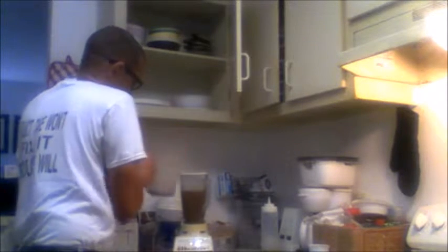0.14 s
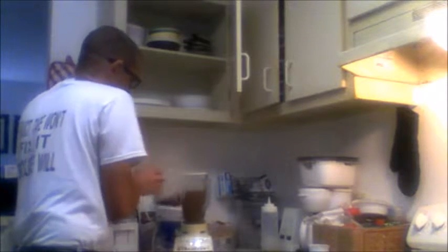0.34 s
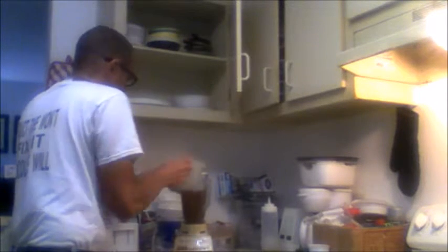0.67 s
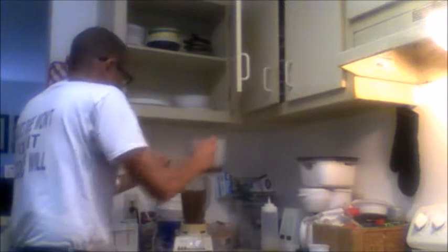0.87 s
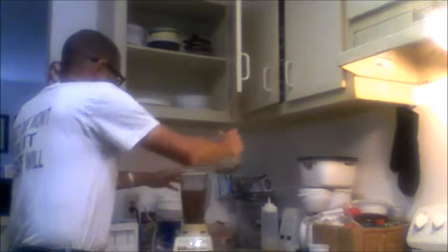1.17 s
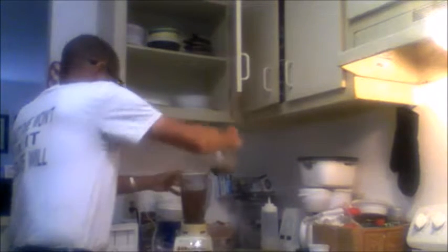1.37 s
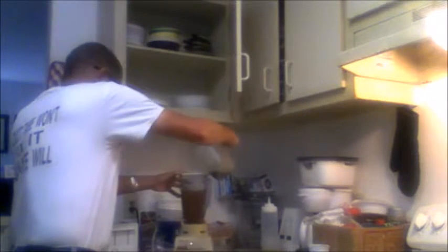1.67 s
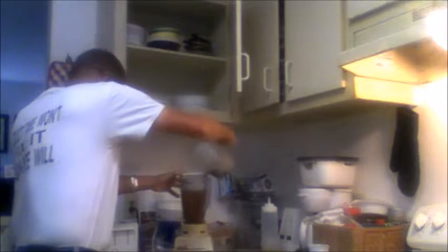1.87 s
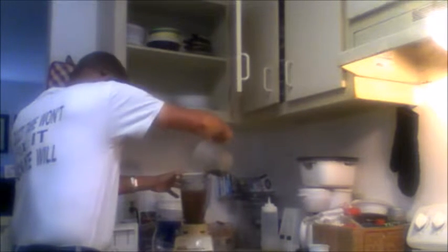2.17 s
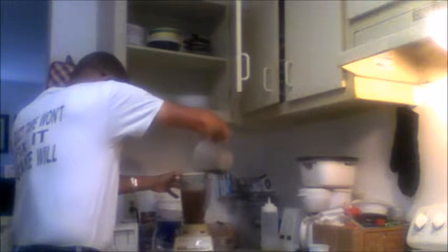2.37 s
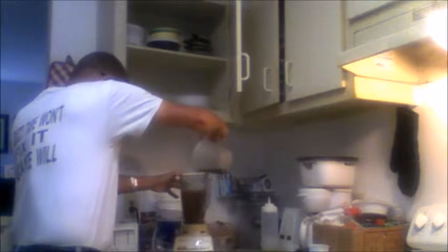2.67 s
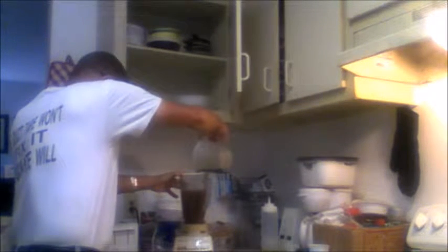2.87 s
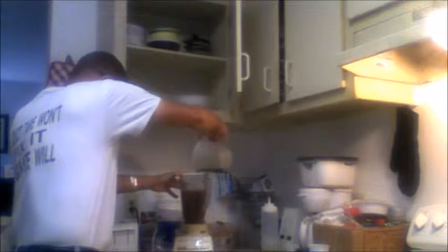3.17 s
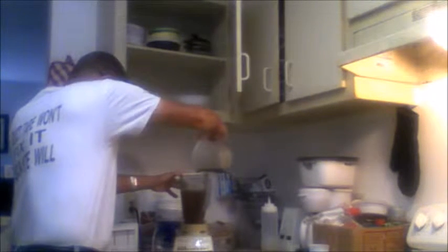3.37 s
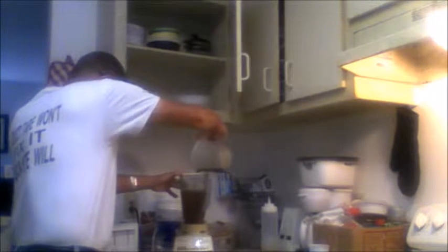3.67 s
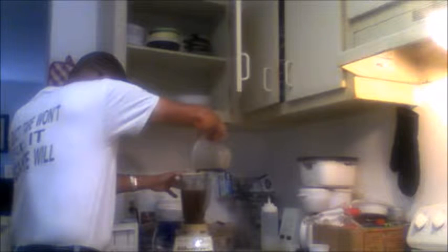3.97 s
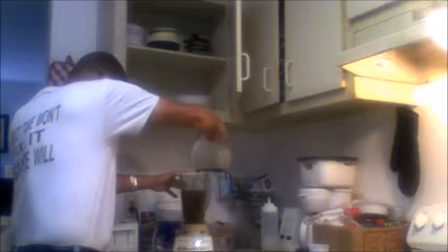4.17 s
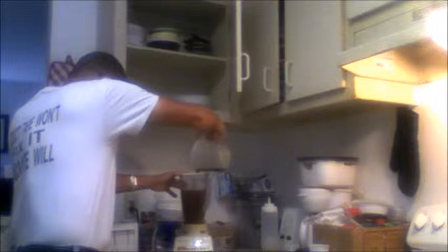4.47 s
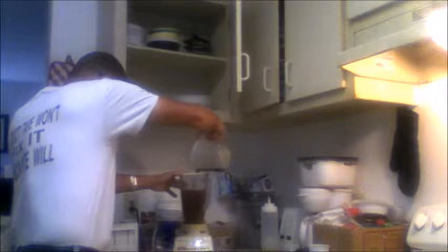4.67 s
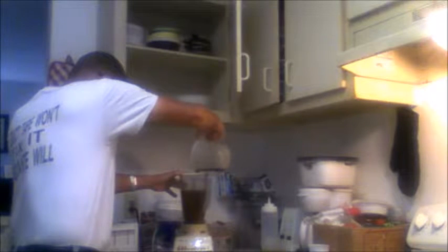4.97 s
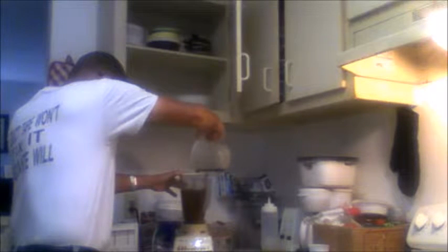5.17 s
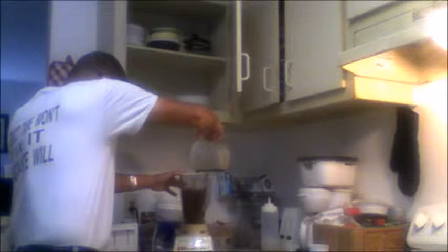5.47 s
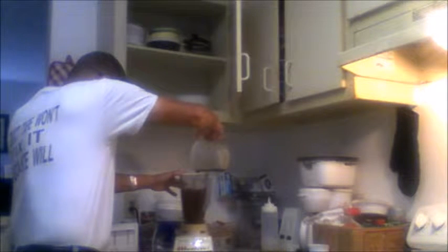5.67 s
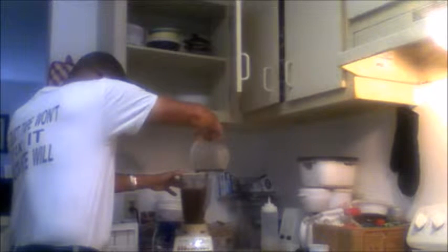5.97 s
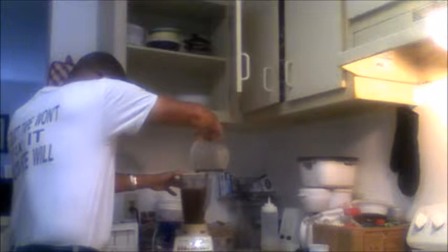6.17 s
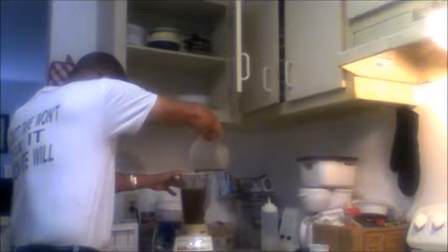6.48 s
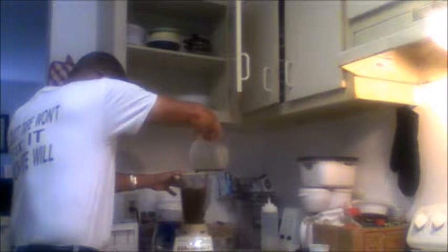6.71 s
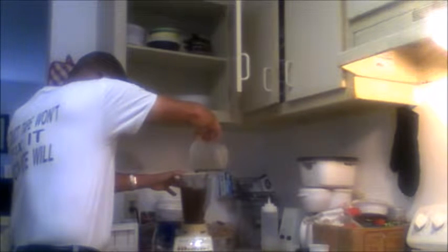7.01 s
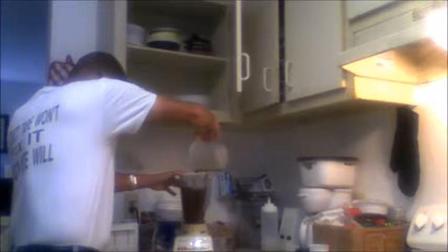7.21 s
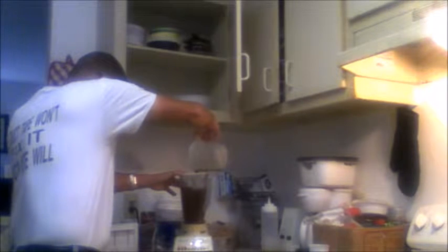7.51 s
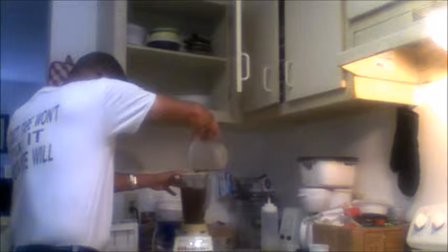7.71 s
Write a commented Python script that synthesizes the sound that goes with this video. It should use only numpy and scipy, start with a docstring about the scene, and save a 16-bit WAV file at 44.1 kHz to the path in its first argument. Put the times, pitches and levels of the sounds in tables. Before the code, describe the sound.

A kitchen blender is already running, its shrill motor whine wavering slightly over a faint hum. Blades churn liquid with a rough, rasping, hissing surge several times a second. Irregular hollow knocks of trapped air and small wet splats break through, the hardest near the middle, with more firm knocks toward the end. Close, narrow-band microphone with little bass, dulled highest treble and a short room echo.

```python
"""A countertop blender in a small kitchen, already running, while liquid is poured slowly into its jar.
From the first moment the motor whines and wavers over its hum (sines locked to one gliding shaft), and the
blades churn, rasp and hiss in surges (random clicks ringing resonances). Soon splats hit the jar wall, air
pockets knock in hollow modes and fine spray swishes up. The strongest gulp comes near the middle with the
biggest surge; hard knocks return near the end, where the bite between surges is weakest."""
import sys
import numpy as np
from scipy import signal
from scipy.fft import rfft, irfft
from scipy.io import wavfile
from scipy.ndimage import uniform_filter1d, minimum_filter1d

SR = 44100
rng = np.random.default_rng(int(sys.argv[2]) if len(sys.argv) > 2 else 0)


def store_pcm(level_fs):
    """Save levels as 16-bit WAV."""
    pcm = np.round(np.clip(level_fs, -1, 1) * 32767).astype(np.int16)
    wavfile.write(sys.argv[1], SR, np.atleast_2d(pcm).T)


N = 346185

# Motor: turning points of the shaft speed as it sags and recovers: time_s, speed_turns_per_s
SHAFT_SPEED = [(0, 241.5), (.27, 235.3), (.57, 243), (1.1, 232.3), (1.45, 243.7), (1.8, 233.4), (2, 233.2),
               (2.27, 238.6), (2.54, 234.5), (2.94, 246.8), (3.22, 233.6), (3.52, 238), (3.82, 232.2),
               (4.13, 240.5), (4.29, 238.7), (4.45, 240.4), (4.62, 237.8), (4.83, 242.2), (5.52, 234.5),
               (5.81, 244), (6.01, 237), (6.18, 239.1), (6.35, 238.1), (6.63, 245), (6.85, 236.8),
               (7.02, 237), (7.25, 244.9), (7.63, 238.4), (7.85, 238.7)]
# Whine overtones: multiple_of_turn_rate, level_db (relative to the whine's law)
WHINE_ORDERS = [(11, -22), (12, 0.5), (18, -17)]
# How the housing passes the gliding whine: pitch_hz (of the 12th multiple), gain_db
HOUSING = [(2790, -2.5), (2800, -1.5), (2825, -2.5), (2845, -2), (2858, 0), (2878, -1.5), (2905, .5),
           (2930, -7.5), (2963, -6)]
# Rotor hum: multiple_of_turn_rate, level_db
HUM_ORDERS = [(4, -58), (4.5, -50.5), (5, -60)]
# The base shaking on the counter, once a turn: time_s, level_db
SHAKING = [(0.0, -47), (.13, -49), (.24, -56), (.45, -50.5), (.65, -49.5), (.9, -53.5), (1.51, -49.5),
           (1.71, -58), (2.12, -45.5), (2.21, -60), (2.53, -56), (2.66, -60), (2.78, -47.5), (3.17, -62),
           (3.26, -52.5), (3.65, -62.5), (3.87, -42.5), (3.98, -53), (4.62, -60.5), (4.79, -51.5),
           (5.08, -55.5), (5.2, -54), (5.56, -57), (5.73, -51), (5.95, -58.5), (6.2, -54), (6.38, -58),
           (6.52, -49.5), (6.7, -55), (7.03, -56), (7.24, -52), (7.85, -57.5)]
# Broad drone of the base on the counter: frequency_hz, density_db_per_hz
DRONE_COLOUR = [(30, -44.5), (70, -61.5), (100, -35.5), (120, -7.5), (190, -8.5), (280, 2.5), (345, -7),
                (400, -15), (700, -9.5), (1500, -23)]

# Blades: how hard they bite between surges, easing as the jar fills: time_s, bite_db
CALM_BITE = [(0.0, -0.3), (1.15, 4), (2.2, -2), (3.0, -8), (4.5, -8), (5.5, -5.5), (6.65, -9),
             (7.85, -12.6)]
# Surges as the vortex opens: crest_s, half_length_s, bite_rise_db, splashing_rise_db
SURGES = [(0.052, 0.073, 8, 6.5), (0.281, 0.077, 6, 4.5), (0.602, 0.11, 4.5, 3), (0.886, 0.021, 6.5, 3.5),
          (1, 0.077, 3.5, 5.5), (1.38, 0.034, 5, 3), (1.679, 0.048, 5.5, 7), (1.838, 0.029, 6, 6),
          (2.023, 0.071, 8, 3), (2.307, 0.075, 3.5, -1.8), (2.423, 0.083, 6, 6), (2.813, 0.118, 7, -1),
          (3.307, 0.075, 13, 8.5), (3.535, 0.056, 3, 0.5), (3.854, 0.085, 16.9, 9.5),
          (4.026, 0.062, 9.3, 4.5), (4.237, 0.1, 5.5, 5.5), (4.658, 0.024, 6, 1.5), (4.813, 0.043, 10, 3.5),
          (4.985, 0.033, 10, 7), (5.175, 0.074, 11.4, 2), (5.344, 0.086, 1.5, 6), (5.592, 0.061, 5, 1.5),
          (5.755, 0.027, 6.5, 0.5), (6.11, 0.09, 6.7, 5), (6.387, 0.081, 10, 4), (6.812, 0.058, 9, 6),
          (7.01, 0.091, 10.5, 5), (7.181, 0.024, 8.5, 1), (7.396, 0.069, 10.5, 4.5),
          (7.556, 0.11, 9.5, 7.5), (7.81, 0.1, 10.4, 1.5)]
# How each sound follows the bite: level_db (at a bite of 0 dB), slope_db_per_db
WHINE_LAW = (-30.5, 0.56)
SPLASH_LAW = (-39.5, 0.2)
GRIND_LAW = (-30, 0.94)
RASP_LAW = (-39, 1.2)
SPRAY_LAW = (-33, 0.2)
# Ringing of the jar wall: frequency_hz, width_hz, level_db
SPLASH_MODES = [(730, 5.5, -0.5), (765, 10, -12.5), (842, 20, -4.5), (951, 26, -0.5), (1079, 7.6, 3),
                (1174, 78, -6.5), (1278, 14, 3), (1299, 22, -5.5), (1473, 24, 3), (1720, 10, -12)]
# Ringing of blades and coupling: frequency_hz, width_hz, level_db
GRIND_MODES = [(1890, 40, -12), (1960, 34, -8), (2089, 36, -10), (2207, 40, -8), (2337, 20, 1),
               (2387, 18, 1.5), (2445, 30, 3), (2543, 28, 2), (2617, 20, 2), (2659, 22, 0), (2855, 70, -6),
               (3058, 26, 2), (3100, 28, -7)]
# Ringing of the rasping blades: frequency_hz, width_hz, level_db
RASP_MODES = [(3330, 24, -5), (3381, 26, 3), (3457, 18, 5.5), (3508, 26, 5), (3600, 50, -8), (3714, 50, -6),
              (3790, 36, -8)]
# High ringing of the jar under the spray: frequency_hz, width_hz, level_db
SPRAY_MODES = [(3919, 34, -1), (4059, 40, 1), (4242, 70, 1.5), (4365, 36, -1), (4479, 44, 1),
               (4576, 44, -1), (4748, 60, -1), (5114, 50, -2), (5255, 90, 0), (5523, 60, 0), (5631, 60, 1),
               (5846, 70, -2), (6040, 60, -3.5), (6298, 60, -4)]
# Broad colours around the ringing: frequency_hz, density_db_per_hz
SPLASH_COLOUR = [(200, -22), (330, -22.5), (650, -25.5), (850, -2.5), (1200, 1.5), (1600, -6), (1900, -3.5),
                 (2400, -4.5), (3500, -31.5)]
GRIND_COLOUR = [(1200, -27.5), (1800, -21.5), (2200, -7.5), (2500, 4.5), (2750, -9.5), (3000, 3),
                (3200, -12.5), (3500, -10), (3800, -19.5), (4500, -27.5), (6000, -53)]
SPRAY_COLOUR = [(1500, -2), (2800, 11), (3500, 6.5), (4200, 2.5), (5000, 1.5), (5600, 3.5), (6300, -1),
                (7000, -6.5), (7600, -34.5)]
# Valleys where the jar wall radiates poorly: centre_hz, half_width_hz, gain_db
WALL_DIPS = [(2275, 35, -3), (2492, 16, -3.5), (2990, 30, -3), (3170, 45, -4.5), (3275, 25, -3.5),
             (3862, 25, -4), (4330, 22, -3)]

# Loose slopping beside the jar's modes: frequency_hz, density_db_per_hz
SLOP_COLOUR = [(260, -18.5), (320, -15), (390, -23.5), (455, 2), (490, 2.5), (540, 10), (620, -8),
               (750, -23.5)]
# Hollow modes of the filled jar: frequency_hz, level_db, t60_s, polarity (1 or -1)
JAR_MODES = [(315, -13, .11, 1), (348, -9, .11, 1), (404, -21, .12, 1), (463, .5, .14, 1),
             (516, 0, .135, -1), (562, -19, .11, -1), (640, -27, .07, -1)]
# Liquid flung against the jar wall: crest_s, level_db, half_length_s, pitch_hz
SPLATS = [(0.092, -22.5, 0.059, 1090), (1.18, -30.5, 0.033, 1115), (1.421, -27, 0.032, 1070),
          (4.99, -31, 0.025, 1080), (5.756, -32, 0.032, 1120), (6.214, -31, 0.051, 1290),
          (6.379, -27, 0.032, 1355), (6.593, -33, 0.022, 1110), (7.36, -23.5, 0.021, 1260)]
# Colour of a splat: multiple_of_its_pitch, density_db_per_hz
SPLAT_COLOUR = [(.64, -27), (.86, -6.5), (1, 9), (1.16, -3), (1.36, -22)]
# Air gulped at the blades: centre_s, level_db, pitch_hz, rebound_delay_s, rebound_db (relative to the gulp)
GULPS = [(0.2098, -29, 485, 0.017, -10), (0.72, -31.5, 560, 0.0253, 1.5), (1.6997, -27.5, 550, 0.027, -6),
         (1.7936, -19, 540, 0.012, -1), (1.9246, -36, 500, 0.025, 1), (2.5357, -23.5, 440, 0.0151, 0),
         (2.5636, -26, 454, 0.016, 1.5), (3.1633, -30.5, 464, 0.017, 3), (3.2431, -29, 506, 0.015, 3),
         (3.7508, -21, 525, 0.012, -5), (3.808, -6.5, 480, 0.018, 0), (4.2633, -29, 484, 0.028, -2.4),
         (4.3082, -31, 486, 0.0167, .7), (4.594, -30, 513, 0.015, -4), (4.6401, -33, 510, 0.0151, -5),
         (5.0836, -31, 490, 0.015, -13), (5.149, -32, 505, 0.016, -3), (5.5519, -20, 473, 0.009, 3.5),
         (5.5859, -21.5, 523, 0.0147, -10.5), (5.9865, -16, 566, 0.023, 3),
         (6.0004, -15, 457, 0.0221, -1.5), (6.0603, -22.5, 490, 0.019, 4), (6.297, -29, 535, 0.0233, -20),
         (6.8118, -19, 567, 0.014, 0.5), (6.8556, -14, 594, 0.012, 0), (6.9222, -25.5, 443, 0.015, -13),
         (6.966, -35, 520, 0.017, -9), (7.4032, -12.5, 622, 0.015, -1), (7.4432, -9.5, 575, 0.012, -14),
         (7.12, -38, 503, 0.013, -0.5), (7.6996, -27.5, 550, 0.016, -5)]
# Fans of spray up the jar wall: crest_s, level_db, half_length_s
SWISHES = [(0.235, -30.5, .02), (0.703, -29, 0.028), (2.484, -35, 0.044), (4.27, -36.5, 0.046),
           (3.942, -33, 0.033), (6.01, -32, 0.025), (6.834, -30, 0.013)]
# Colour of a swish: frequency_hz, density_db_per_hz
SWISH_COLOUR = [(3000, -12), (4200, 1.5), (5000, -5.5), (6500, -20.5)]

# Whine: slow swelling, faster flicker of each overtone, and depth of the fast uneven tremor
WHINE_WAVER_DB, WHINE_FLICKER_DB, WHINE_ROUGHNESS = .6, 1.1, .15
COUPLING_HZ, COUPLING_WIDTH_HZ, RATTLE_DB = 719, 8.2, -47
MAINS_HZ = 120

# Chance flicker of the bite, the pelting and the hiss
BITE_FLICKER_DB, PELTING_FLICKER_DB, HISS_FLICKER_DB = .45, .85, .6
BLADE_THROB = 0.15  # depth of the pelting's pulse, six times a turn
GRIND_WANDER_DB = 2.8  # how unevenly the shifting liquid drives the blade modes
RASP_DB_PER_SAG = .4  # dB for each turn per s that the motor sags
SPRAY_PER_SPLASH = 0.21  # dB of hiss per dB of splashing
SPRAY_PER_SWELL_DB = -9  # hiss thrown up by a gulp, relative to its swell
SPRAY_RING_DB = -9.5  # ringing, relative to the broad mist

# Slopping: level at rest, dB for each turn per s of sag, loose share, chance flicker
SLOP_DB, SLOP_DB_PER_SAG, LOOSE_SLOP_DB, SLOP_FLICKER_DB = -44, 0.46, -2, 1.6
# Swell after a gulp: level for a 0 dB gulp, dB per dB of gulp, delay, half-length
SWELL_DB, SWELL_FOLLOWS, SWELL_LAG_S, SWELL_S = -30, 0.38, 0.019, 0.039
SPLAT_DB = -2  # offset of all the splats
# Half-length of a 0 dB gulp; dB of length gained per dB of level lost
GULP_S, ABRUPTNESS = .007, .13
REBOUND_PITCH = 0.941  # share of the gulp's pitch

CEILING, CUTOFF_HZ = .95, 7520  # limiter ceiling (full scale 1) and top of the band


def from_db(db):
    """Decibels to gain."""
    return 10 ** (np.asarray(db) / 20)


def rms_one(x):
    """Scale to unit rms."""
    return x / np.sqrt(np.mean(x ** 2) + 1e-20)


def in_time(rows):
    """Join the points of a time, value table by straight lines, sample by sample."""
    s, values = np.transpose(rows)
    return np.interp(np.arange(N) / SR, s, values)


def eased(rows):
    """Glide smoothly from each turning point to the next."""
    s, values = np.transpose(rows)
    steps = np.arange(len(s))
    part, whole = np.modf(np.interp(np.arange(N) / SR, s, steps))
    return np.interp(whole + (1 - np.cos(np.pi * part)) / 2, steps, values)


def swell(s, length):
    """A smooth rise and fall around time s; height 1."""
    return np.exp(-np.minimum(((np.arange(N) / SR - s) / length) ** 2 / 2, 20))


def drift(rate_hz, size=4096):
    """Smooth chance that changes about `rate_hz` times a second; spread 1."""
    hz = np.arange(size // 2 + 1) * SR / N
    slow = irfft(rfft(rng.standard_normal(size)) / (1 + (hz / rate_hz) ** 2), size)
    return np.interp(np.linspace(0, size - 1, N), np.arange(size), rms_one(slow))


def grains(per_s, spread_db):
    """Random clicks of uneven size and sign, like separate drops; rms 1."""
    sizes = from_db(spread_db * np.minimum(rng.exponential(1, N), 4))
    signed = sizes * rng.choice([-1, 1], N)
    return rms_one(signed * (rng.random(N) < per_s / SR))


def coloured(x, spectrum):
    """Give x a broad spectrum that falls away past its ends; rms 1."""
    hz = np.arange(1, N // 2 + 2) * SR / N
    at, db = np.transpose(spectrum)
    skirts = np.minimum(1, np.minimum(hz / at[0], at[-1] / hz)) ** 2
    gain = from_db(np.interp(np.log(hz), np.log(at), db))
    return rms_one(irfft(rfft(x) * skirts * gain, N))


def resonate(x, modes, wander_db=0):
    """Parallel resonances, each driven more or less as the liquid shifts; rms 1."""
    out = 0
    for hz, width, db in modes:
        r = np.exp(-np.pi * width / SR)
        poles = [1, -2 * r * np.cos(2 * np.pi * hz / SR), r * r]
        ring = signal.lfilter([1 - r, 0, r - 1], poles, x)
        out = out + from_db(db + wander_db * drift(7.2)) * ring
    return rms_one(out)


def follow(law, bite_db):
    """Gain of a sound that grows with the bite of the blades."""
    db, slope = law
    return from_db(db + slope * bite_db)


def kitchen(x, t60, wet_db):
    """Direct sound plus the dense, dying reflections of cupboards and walls."""
    t = np.arange(SR // 2) / SR
    tail = rng.standard_normal(len(t)) * from_db(-60 * t / t60) * (t > .004)
    reflections = signal.fftconvolve(x, tail / np.linalg.norm(tail))[:N]
    wet = from_db(wet_db)
    return (x + wet * reflections) / np.sqrt(1 + wet ** 2)


def tones(turns, orders, flutter_db, flutter_rate):
    """Sines at multiples of the shaft's turning, each fluttering in strength."""
    out = 0
    for order, db in orders:
        sine = np.sin(2 * np.pi * order * turns)
        out = out + from_db(db) * rms_one(sine * from_db(flutter_db * drift(flutter_rate)))
    return out


def motor_whine(per_s, turns, bite_db):
    """High overtones of the shaft grow with the bite, pass the housing and echo in the kitchen."""
    housing = from_db(np.interp(12 * per_s, *np.transpose(HOUSING)))
    level = follow(WHINE_LAW, bite_db) * housing * from_db(WHINE_WAVER_DB * drift(9.8))
    tremor = rms_one(1 + WHINE_ROUGHNESS * drift(74))
    whine = level * tones(turns, WHINE_ORDERS, WHINE_FLICKER_DB, flutter_rate=40)
    return kitchen(whine * tremor, t60=.3, wet_db=-7.5)


def base_shaking(turns):
    """The base shakes on the counter once a turn."""
    return from_db(in_time(SHAKING)) * rms_one(np.sin(2 * np.pi * turns) * from_db(1.4 * drift(6)))


def coupling_rattle(per_s, turns):
    """The coupling rattles three times a turn, loudest when that meets its resonance."""
    in_tune = 1 / np.hypot(1, 2 * (3 * per_s - COUPLING_HZ) / COUPLING_WIDTH_HZ)
    rattle = rms_one(np.sin(6 * np.pi * turns) * from_db(3.1 * drift(11)))
    return from_db(RATTLE_DB) * in_tune * rattle


def mains_and_drone():
    """A steady mains tone over noise coloured as the base droning on the counter."""
    mains = from_db(-71.5) * np.sin(2 * np.pi * MAINS_HZ * np.arange(N) / SR)
    drone = from_db(-61.0 + 1.8 * drift(12)) * coloured(rng.standard_normal(N), DRONE_COLOUR)
    return mains + drone


def motor(per_s, turns, bite_db):
    """Whine, shaking, rattle and rotor hum over the mains tone and the drone of the base."""
    hum = tones(turns, HUM_ORDERS, flutter_db=3.5, flutter_rate=9)
    return (motor_whine(per_s, turns, bite_db) + base_shaking(turns) + coupling_rattle(per_s, turns)
            + hum + mains_and_drone())


def hail(per_s, pelting):
    """Drops and collapsing cavities pelt jar and blades, in flurries and in step with the shaft."""
    return grains(per_s, spread_db=2.0) * pelting


def splashing(pelting):
    """Pelting rings the jar wall, over a broad splash."""
    ringing = resonate(hail(5000, pelting), SPLASH_MODES, wander_db=2.15)
    return ringing + from_db(-0.5) * coloured(hail(8000, pelting), SPLASH_COLOUR)


def grinding(pelting):
    """Pelting rings the blades and coupling, over a broad grind."""
    ringing = resonate(hail(7000, pelting), GRIND_MODES, wander_db=GRIND_WANDER_DB)
    broad = coloured(hail(12000, pelting), GRIND_COLOUR)
    return from_db(-2.0) * ringing + from_db(-4.0) * broad


def rasping(pelting, sag):
    """Higher blade modes ring harder as the motor sags."""
    return from_db(RASP_DB_PER_SAG * sag) * resonate(hail(7000, pelting), RASP_MODES, wander_db=4.5)


def spraying(pelting, bite_db, splashing_db, stirred):
    """Dense fine drops hiss and ring the jar, following bite and splashing; gulps add hiss."""
    churned = follow(SPRAY_LAW, bite_db) * from_db(SPRAY_PER_SPLASH * splashing_db)
    level = np.hypot(churned, from_db(SPRAY_PER_SWELL_DB) * stirred)
    mist = coloured(hail(20000, pelting), SPRAY_COLOUR)
    ringing = resonate(grains(5000, spread_db=2.0), SPRAY_MODES, wander_db=6.0)
    return level * from_db(HISS_FLICKER_DB * drift(18)) * (mist + from_db(SPRAY_RING_DB) * ringing)


def through_wall(x):
    """The jar wall holds back the bands between its resonances."""
    hz = np.arange(N // 2 + 1) * SR / N
    db = sum(gain_db * np.exp(-((hz - centre) / width) ** 2 / 2) for centre, width, gain_db in WALL_DIPS)
    return irfft(rfft(x) * from_db(db), N)


def blades(turns, sag, bite_db, splashing_db, stirred):
    """Splash, grind, rasp and spray share one pulsing pelting and are heard through the jar wall."""
    throb = 1 + BLADE_THROB * np.cos(12 * np.pi * turns)
    pelting = rms_one(from_db(PELTING_FLICKER_DB * drift(15.0)) * throb)
    # splashing follows the bite between surges, and rises by its own amount in each surge
    splash_level = follow(SPLASH_LAW, in_time(CALM_BITE)) * from_db(splashing_db)
    churn = splash_level * splashing(pelting)
    churn = churn + follow(GRIND_LAW, bite_db) * grinding(pelting)
    churn = churn + follow(RASP_LAW, bite_db) * rasping(pelting, sag)
    return through_wall(churn + spraying(pelting, bite_db, splashing_db, stirred))


def jar(clicks):
    """Hollow modes; the two main ones start opposed, so a knock swells and then throbs as they beat."""
    out = 0
    for hz, db, t60, polarity in JAR_MODES:
        r, w = from_db(-60 / (t60 * SR)), 2 * np.pi * hz / SR
        ring = signal.lfilter([0, np.sin(w)], [1, -2 * r * np.cos(w), r * r], clicks + 1e-18)
        out = out + polarity * from_db(db) * ring
    return out


def stirring():
    """Each gulp stirs up a short swell in the liquid; the strongest at each moment counts."""
    swells = [from_db(SWELL_DB + SWELL_FOLLOWS * db) * swell(s + SWELL_LAG_S, SWELL_S)
              for s, db, *_ in GULPS]
    return np.max(swells, axis=0)


def slopping(sag, stirred):
    """Liquid slops in the jar, louder as the motor labours and after each gulp."""
    hollow = rms_one(jar(np.diff(grains(400, spread_db=2.5), prepend=0)))
    loose = from_db(LOOSE_SLOP_DB) * coloured(grains(600, spread_db=4.0), SLOP_COLOUR)
    level = np.hypot(from_db(SLOP_DB + SLOP_DB_PER_SAG * sag), stirred)
    return level * rms_one((hollow + loose) * from_db(SLOP_FLICKER_DB * drift(8.2)))


def splats():
    """Now and then a sheet of liquid rattles the jar wall; where it lands sets the pitch."""
    ringing = resonate(grains(6600, spread_db=-5.0), SPLASH_MODES)
    out = 0
    for s, db, length, hz in SPLATS:
        colour = [(hz * multiple, level) for multiple, level in SPLAT_COLOUR]
        out = out + from_db(db) * swell(s, length) * coloured(ringing, colour)
    return from_db(SPLAT_DB) * out


def pulsation(s, db, hz):
    """A pocket of air pulsates for a few cycles, a strong one more abruptly."""
    push, t = np.zeros(N), np.arange(N) / SR - s
    half_length = GULP_S * from_db(-ABRUPTNESS * db)
    near = np.abs(t) < half_length
    shape = np.cos(np.pi / 2 * t[near] / half_length) ** 4
    push[near] = from_db(db) * 2 * shape / shape.sum() * np.cos(2 * np.pi * hz * t[near])
    return push


def gulps():
    """Each pocket and its one rebound knock in the hollow jar, with a little kitchen around them."""
    push = 0
    for s, db, hz, delay, rebound_db in GULPS:
        push = push + pulsation(s, db, hz) + pulsation(s + delay, db + rebound_db, hz * REBOUND_PITCH)
    return kitchen(from_db(2.1) * jar(push), t60=.3, wet_db=-17)


def without_bass(x):
    """A jar this small radiates no bass."""
    return signal.sosfilt(signal.butter(4, 200, "high", fs=SR, output="sos"), x)


def swishes():
    """A burst of fine drops sweeps the jar wall."""
    force = sum(from_db(db) * swell(s, length) for s, db, length in SWISHES)
    return force * coloured(grains(12000, spread_db=5.0), SWISH_COLOUR)


def scene():
    """One shaft drives the motor's tones and the churning; the surging bite sets how loud they are."""
    per_s = eased(SHAFT_SPEED)
    sag = per_s.mean() - per_s  # turns per s below the average
    turns = np.cumsum(per_s * (1 + drift(30) / 1400)) / SR  # with a slight chance unsteadiness
    bite_db, splashing_db = in_time(CALM_BITE) + BITE_FLICKER_DB * drift(36), 0
    for s, length, bite_rise_db, splash_rise_db in SURGES:
        surge = swell(s, length)
        bite_db = bite_db + bite_rise_db * surge
        splashing_db = splashing_db + splash_rise_db * surge
    stirred = stirring()
    machine = motor(per_s, turns, bite_db) + blades(turns, sag, bite_db, splashing_db, stirred)
    hollow = without_bass(slopping(sag, stirred) + gulps())
    return (machine + hollow + splats() + swishes())[None]


def record(dry):
    """A narrow-band microphone chain: no deep bass, a quick limiter, and the top cut off."""
    thin = signal.sosfilt(signal.butter(2, 75, "high", fs=SR, output="sos"), dry)
    allowed = CEILING / np.maximum(np.abs(thin), CEILING)
    # hold the lowest gain over 10 ms, then smooth it over 5 ms
    gain = uniform_filter1d(minimum_filter1d(allowed, size=441), size=221)
    return signal.sosfilt(signal.ellip(10, .2, 70, CUTOFF_HZ, fs=SR, output="sos"), thin * gain)


dry = scene()
out = record(dry)
store_pcm(out)
```